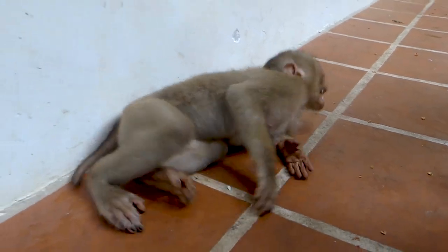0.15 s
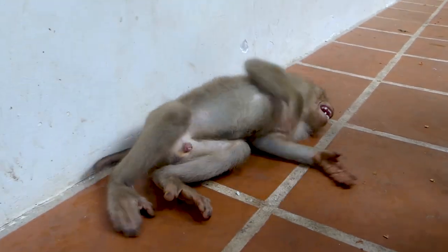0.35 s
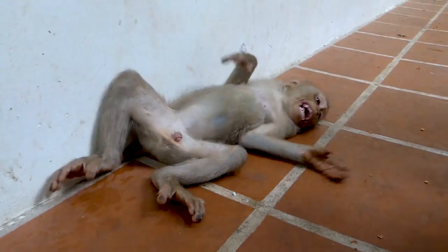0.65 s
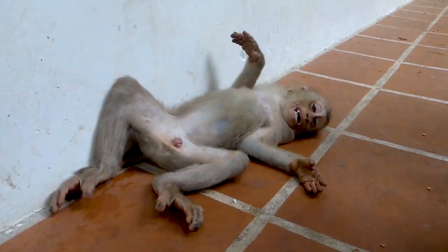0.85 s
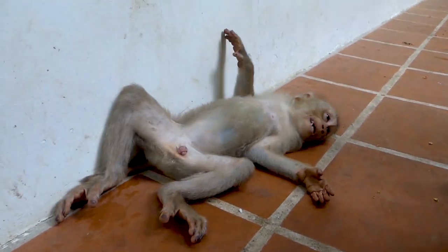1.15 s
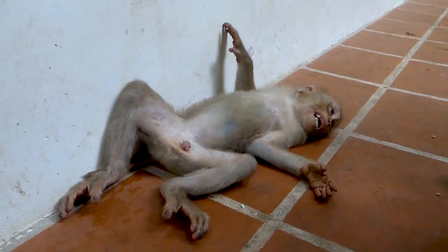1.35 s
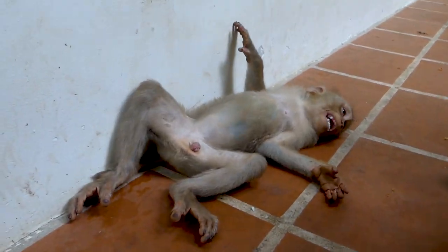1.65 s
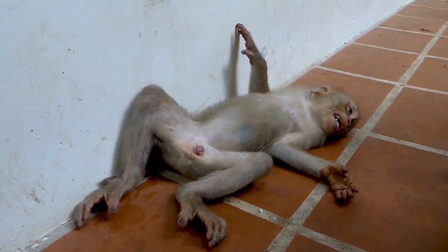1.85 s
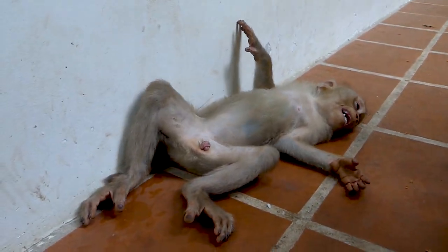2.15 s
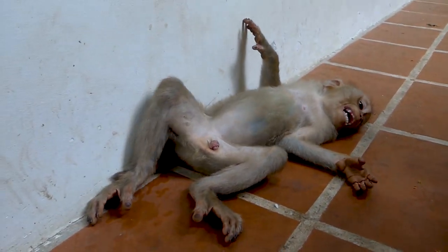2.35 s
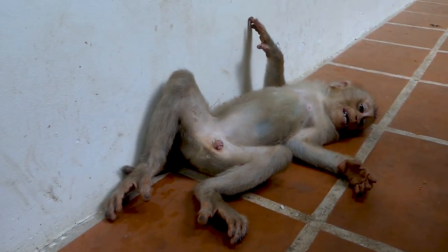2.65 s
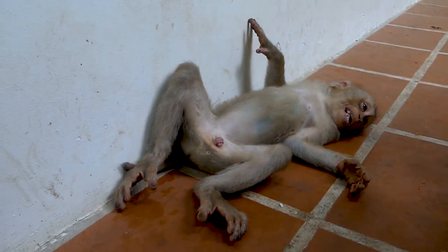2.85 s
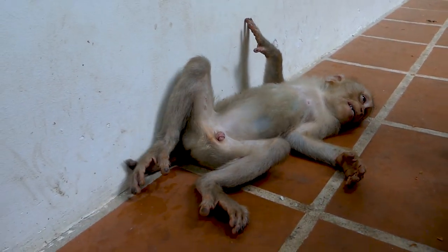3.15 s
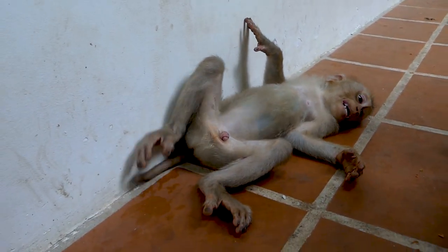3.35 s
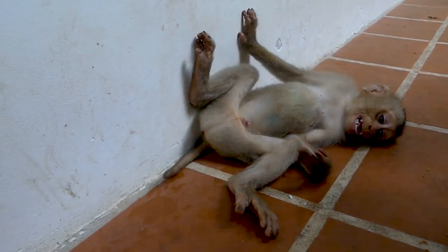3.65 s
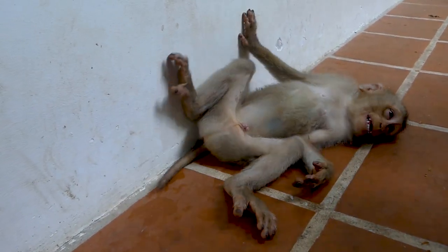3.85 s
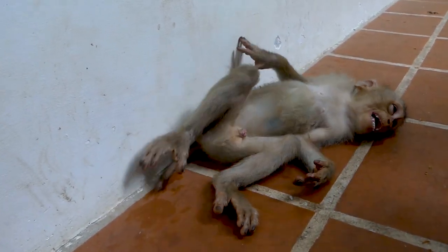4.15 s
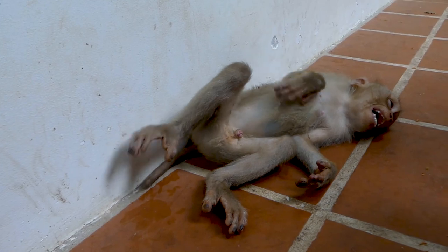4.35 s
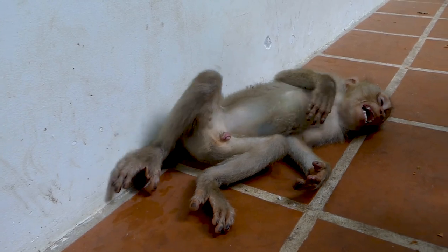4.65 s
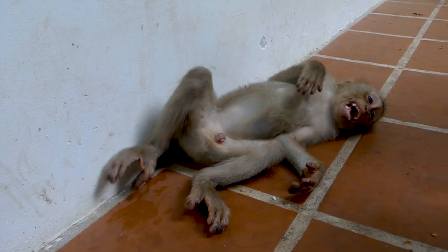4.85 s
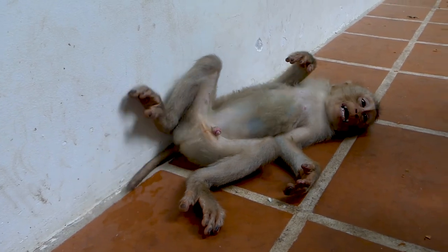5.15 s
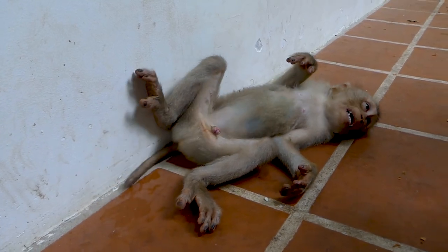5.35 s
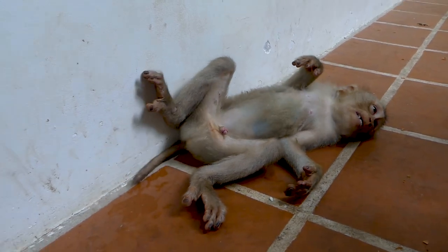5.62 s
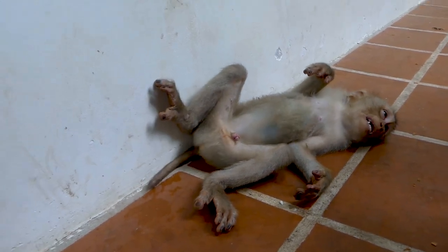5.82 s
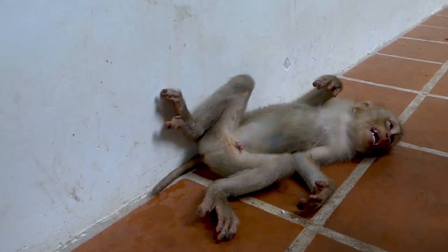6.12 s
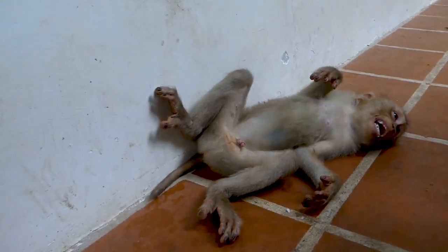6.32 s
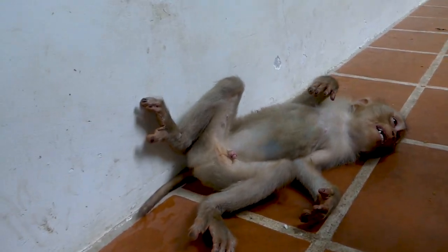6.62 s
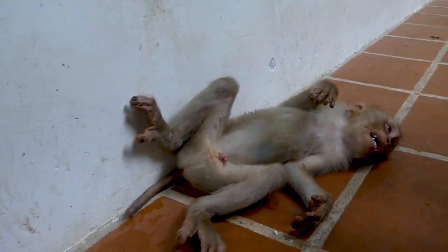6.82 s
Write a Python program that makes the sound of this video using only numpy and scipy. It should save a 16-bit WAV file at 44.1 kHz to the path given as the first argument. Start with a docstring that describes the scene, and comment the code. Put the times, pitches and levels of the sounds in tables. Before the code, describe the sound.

Twenty brief, shrill, torn monkey squeals, many starting with a click and falling squeak, ring off hard floor and wall above faint hiss.

```python
"""A low rumble with thin hiss runs throughout; a baby monkey on a tiled floor by a wall screams twenty times.
Most screams catch with a click (decaying noise) and start as a thin falling squeak (gliding harmonics).
They break into a harsh rasp (jittered folds, a stray fold, air noise) that swells, sags and runs out of air.
Some clear again into a whistle; low moans and grunts lie under the rasp, and fur brushes the tiles now and then.
Floor and wall answer each sound with quick random echoes, then the room rings on."""
import sys
import numpy as np
from scipy import signal
from scipy.fft import rfft, irfft, next_fast_len
from scipy.io import wavfile

SR = 44100
rng = np.random.default_rng(int(sys.argv[2]) if len(sys.argv) > 2 else 0)


def materialize(psi):
    """Save the field psi as 16-bit PCM at rate SR to the path in sys.argv[1].

    A 1-D psi becomes a single channel; in a 2-D psi each row is a channel.
    """
    bounded = np.clip(np.atleast_2d(psi).T, -1, 1)
    quanta = np.round(bounded * 32767).astype(np.int16)
    wavfile.write(sys.argv[1], SR, quanta)


N = 307729
CUTOFF_HZ = 15900


def from_db(db):
    """Decibels to gain."""
    return 10 ** (np.asarray(db) / 20)


def rms_one(x):
    """Scale to unit rms."""
    return x / np.sqrt(np.mean(x ** 2) + 1e-20)


def seconds(length_s):
    """Time axis in seconds."""
    return np.arange(int(length_s * SR)) / SR


def at_hz(points, hz):
    """Read a spectrum on a log-frequency axis."""
    points = np.array(points)
    return np.interp(np.log(hz + 1), np.log(points[:, 0]), points[:, 1])


def colour(x, gain_at):
    """Filter by a gain that is a function of frequency."""
    size = next_fast_len(x.shape[-1])
    gain = gain_at(np.fft.rfftfreq(size, 1 / SR))
    return irfft(rfft(x, size) * gain, size)[..., :x.shape[-1]]


def noise(spectrum, shape):
    """Coloured noise of unit rms."""
    return rms_one(colour(rng.standard_normal(shape), lambda hz: from_db(at_hz(spectrum, hz))))


def lean(x, balance):
    """Tip each frequency to the left or right."""
    return colour(x, lambda hz: from_db(at_hz(balance, hz) * np.array([[.5], [-.5]])))


def wander(rate_hz, size):
    """Random motion of spread 1, mostly slower than rate_hz."""
    return rms_one(colour(rng.standard_normal(size), lambda hz: 1 / (1 + (hz / rate_hz) ** 2)))


def gate(t, rise_s, fall_s):
    """Opens at the start of t and closes at its end."""
    return np.clip(t / rise_s, 0, 1) * np.clip((t[-1] - t) / fall_s, 0, 1)


def add(out, start_s, x):
    """Mix x in at start_s."""
    at = max(0, int(start_s * SR))
    out[..., at:at + x.shape[-1]] += x[..., :N - at]


def band(x, low_hz, high_hz):
    """A band with softly sloping edges."""
    return colour(x, lambda hz: ((1 + (low_hz / (hz + 1)) ** 20) * (1 + (hz / high_hz) ** 20)) ** -.5)


# background spectrum: freq_hz, relative_db (per Hz)
AMBIENCE_SPECTRUM = [(15, -52), (25, -31), (48, -20), (153, 0.5), (242, -11.5), (489, -7), (796, -13.5),
                     (911, -14), (1740, -19), (3340, -21.5), (3920, -19.5), (4740, -21.5), (10400, -29),
                     (11900, -27), (16000, -33.5)]
# background level: time_s, level_db
AMBIENCE_LEVEL = [(0, -51), (1.2, -53), (1.8, -51), (4.06, -50.5), (4.5, -54.5), (5.15, -55), (5.85, -51),
                  (6.98, -52.5)]
# background stereo balance: freq_hz, left_minus_right_db
AMBIENCE_BALANCE = [(60, 15), (150, 8.5), (380, 5), (950, -1), (2380, -1), (5980, 1.5), (15000, -0.5)]


def ambience(shared=0.21):
    """Distant rumble and thin hiss: coloured noise, partly alike at both ears."""
    bed = rms_one(noise(AMBIENCE_SPECTRUM, (2, N)) + shared * noise(AMBIENCE_SPECTRUM, N))
    level_db = np.interp(np.arange(N) / SR, *np.transpose(AMBIENCE_LEVEL))
    return rms_one(lean(bed, AMBIENCE_BALANCE)) * from_db(level_db)


# fur sliding on tile and wall: start_s, length_s, level_db (before the hump-shaped fade)
FUR_SLIDES = [(0.207, 0.41, -47.5), (3.422, 0.25, -43.5), (4.599, 0.22, -52)]
# fur friction spectrum: freq_hz, relative_db (per Hz)
FUR_SPECTRUM = [(290, -54), (500, -13), (960, -27), (1300, -7), (2260, -14.5), (4530, 0), (5390, -8.5),
                (16000, -12)]


def fur():
    """Soft swishes as the body shifts: noise that swells and fades."""
    out = np.zeros((2, N))
    for start_s, length_s, level_db in FUR_SLIDES:
        size = int(length_s * SR)
        add(out, start_s, noise(FUR_SPECTRUM, (2, size)) * np.hanning(size) * from_db(level_db))
    return out


def tail(spectrum, t60_s, level_db):
    """Diffuse echoes, different at each ear, dying away; level_db sets their total energy."""
    t = np.arange(SR) / SR
    echoes = noise(spectrum, (2, SR)) * from_db(-60 * t / t60_s) * np.clip(t / .006, 0, 1)
    return from_db(level_db) * rms_one(echoes) / np.sqrt(SR)


# echo spectrum of the short ring: freq_hz, relative_db
SHORT_RING_SPECTRUM = [(300, 3), (2000, -11.5), (4000, 3), (9000, 0), (16000, -3)]
# echo spectrum of the long ring: freq_hz, relative_db
LONG_RING_SPECTRUM = [(300, 0), (2600, -17.5), (3900, 0), (5500, -7.5), (7700, -8.5), (16000, -21)]


def room(x):
    """A short bright ring and a faint long one."""
    short = tail(SHORT_RING_SPECTRUM, t60_s=0.23, level_db=-14.5)
    long = tail(LONG_RING_SPECTRUM, t60_s=0.85, level_db=-28.5)
    return x + signal.fftconvolve(x, short + long, axes=1)[:, :N]


def corner(x, scatter_db, decay_s=0.0037, evenness=0.15):
    """Floor and wall add a cluster of quick echoes, new for each sound and different at each ear."""
    t = np.arange(768) / SR
    scatter = rms_one(rng.standard_normal((2, len(t))) * np.exp(-t / decay_s))
    paths = from_db(scatter_db) * scatter / np.sqrt(len(t))
    paths[:, 0] += 1   # direct sound
    response = rfft(paths, 2 * len(t))
    # rough surfaces fill the deepest notches
    paths = irfft(response / np.abs(response) ** evenness)[:, :len(t)]
    return signal.fftconvolve(x[None], rms_one(paths) / np.sqrt(len(t)), axes=1)


def folds(pitch_hz, overtone_db):
    """Harmonics of the vocal folds along a pitch track, overtone_db per overtone, at unit rms."""
    k = np.arange(1, max(2, int(CUTOFF_HZ / pitch_hz.mean()) + 1))[:, None]
    phase = 2 * np.pi * k * np.cumsum(pitch_hz) / SR
    return rms_one((from_db(overtone_db * (k - 1)) * np.sin(phase)).sum(axis=0))


def grunt(length_s, level_db, sag_db, first_hz=430, last_hz=280, below_db=-16, jitter=0.1624):
    """A faint hoarse undertone: unsteady low folds that sink while the rasp is pushed out."""
    t = seconds(length_s)
    pitch_hz = np.geomspace(first_hz, last_hz, len(t)) * (1 + jitter * wander(166, len(t)))
    push = from_db(level_db + below_db - sag_db * t / length_s)
    return folds(pitch_hz, overtone_db=-2) * push * gate(t, rise_s=0.022, fall_s=0.13)


def glide(length_s, first_hz, last_hz, level_db, overtone_db, jitter=0.017, slack_hz=3300):
    """The folds lock into one gliding note; low notes are slack and waver more."""
    t = seconds(length_s)
    waver = jitter * np.sqrt(slack_hz / first_hz) * wander(520, len(t))
    pitch_hz = np.geomspace(first_hz, last_hz, len(t)) * (1 + waver)
    # 2.5 dB lift up to 10.5 kHz, then a fall
    note = colour(folds(pitch_hz, overtone_db), lambda hz: from_db(at_hz([(10500, 2.5), (13000, -15)], hz)))
    return from_db(level_db + wander(240, len(t))) * note * gate(t, rise_s=0.004, fall_s=0.0078)


def add_note(out, start_s, note):
    """Place a clear note among its quick echoes."""
    add(out, start_s, corner(note, scatter_db=8, decay_s=0.0024, evenness=0.72))


# low voiced glides: start_s, length_s, first_pitch_hz, last_pitch_hz, level_db (before glide and throat filters)
MOAN_GLIDES = [ (.39, 0.073, 1546, 1705, -43.5), (1.441, 0.04, 1288, 1380, -38),
               (2.932, 0.0465, 1104, 971, -34.5), (3.321, 0.033, 1046, 920, -35),
               (3.626, .045, 1725, 2180, -46.5), (4.332, 0.031, 1770, 1580, -42.5),
               (5.297, .052, 1410, 1147, -41), (5.786, 0.035, 1144, 725, -33),
               (5.82, 0.027, 942, 876, -32.5), (6.088, 0.043, 1207, 1113, -40.5),
               (6.786, .04, 962, 904, -34.5)]
# throat colour of the moans: freq_hz, gain_db
MOAN_THROAT = [(800, 0), (1300, -1), (2000, 1), (3000, -2), (4500, -20), (12000, 26)]


def moans():
    """Low glides under the rasp, dipped near 4.5 kHz and lifted towards 12 kHz by the throat."""
    out = np.zeros((2, N))
    for start_s, *track in MOAN_GLIDES:
        note = glide(*track, overtone_db=-6)
        add_note(out, start_s, colour(note, lambda hz: from_db(at_hz(MOAN_THROAT, hz))))
    return out


# throat openings: start_s, level_db (noise rms before gate and decay)
THROAT_CATCHES = [(0.6464, -21.5), (.9834, -25), (1.3808, -24), (1.6829, -18.5), (1.9989, -20.5),
                  (2.362, -20), (3.304, -16.5), (3.5696, -18), (3.955, -18), (4.2372, -12.5),
                  (5.2656, -20.5), (6.054, -14.5), (6.3522, -18), (6.758, -19.5)]


def catches(decay_s=0.0027):
    """A sharp spit of air as the throat opens: bright noise dying in milliseconds."""
    out = np.zeros((2, N))
    t = seconds(0.032)
    shape = np.exp(-t / decay_s) * gate(t, rise_s=0.0012, fall_s=.005)
    for start_s, level_db in THROAT_CATCHES:
        air = noise([(300, -24), (1000, -10.0), (4000, -7.5), (6000, 1), (15000, 1)], len(t))
        add(out, start_s, corner(from_db(level_db) * air * shape, scatter_db=14))
    return out


# thin squeaks that open a scream: start_s, length_s, first_pitch_hz, level_db (before glide filter),
# db_per_overtone
OPENING_SQUEAKS = [ (0.979, 0.0083, 7670, -28, -15), (.991, 0.014, 3610, -31, -17),
                   (1.385, 0.028, 3270, -22.5, -8.5), (2.363, 0.0066, 6300, -20, 3),
                   (2.376, 0.0068, 3960, -13.5, -5), (2.902, 0.0086, 3310, -14, 0),
                   (3.303, 0.015, 3120, -19.5, -8), (3.571, 0.014, 3600, -25.5, -25),
                   (3.955, 0.019, 3500, -19.5, -54), (4.831, .019, 10500, -28.5, -28),
                   (5.275, 0.02, 3560, -24, -7), (6.054, 0.0263, 3420, -22.5, -21),
                   (6.36, 0.027, 3460, -29.5, -6.5), (6.759, 0.02, 3530, -28.5, -18)]
SQUEAK_FALL = 0.1016   # share of pitch lost


def squeaks():
    """Thin notes of the locked folds, each falling in pitch."""
    out = np.zeros((2, N))
    for start_s, length_s, first_hz, level_db, overtone_db in OPENING_SQUEAKS:
        note = glide(length_s, first_hz, first_hz * (1 - SQUEAK_FALL), level_db, overtone_db)
        add_note(out, start_s, note)
    return out


# clear notes inside a scream: start_s, length_s, rasp_change_db, first_pitch_hz, last_pitch_hz,
# level_db (before glide filter), db_per_overtone
LOCKED_WHISTLES = [ (0.189, 0.013, 6.5, 5110, 5400, -26, -39), (0.372, 0.038, 0.5, 4040, 3900, -34, -20),
                   (0.728, 0.029, -3, 3480, 3200, -37, -20),
                   (1.726, 0.0333, -15.5, 3900, 3620, -25.5, -1.5),
                   (2.05, 0.027, -12.5, 3910, 3790, -22, 1), (2.41, .04, -15.5, 3956, 3640, -24.5, 0),
                   (3.32, 0.014, -18, 2600, 2480, -25, -50), (3.328, 0.019, 0.5, 2046, 1900, -25.5, -20),
                   (3.348, 0.019, -3, 4940, 4740, -31, -36), (3.591, 0.0307, 0, 2976, 3157, -25.5, -24),
                   (3.618, 0.03, -13, 3670, 3710, -33, -1.5), (3.969, 0.021, 2, 2384, 1916, -23.5, -23),
                   (4.876, 0.0447, -2.5, 4200, 4056, -28, -17), (6.075, 0.014, 1.5, 2400, 2090, -21.5, -26)]


def whistles():
    """The folds lock into a clear note; also returns the change of the rasp meanwhile, in dB."""
    out, rasp_change = np.zeros((2, N)), np.zeros(N)
    for start_s, length_s, change_db, *note in LOCKED_WHISTLES:
        add_note(out, start_s, glide(length_s, *note))
        add(rasp_change, start_s, change_db * gate(seconds(length_s), rise_s=0.0087, fall_s=0.0023))
    return out, rasp_change


# glide of the out-of-step second fold: first_hz, last_hz
STRAY_FOLD_HZ = (2059, 1453)


def torn_voice(t, first_hz, last_hz, rough, jitter=0.0608, jitter_hz=450, air=2.45, sag=.05):
    """Overdriven folds vibrate chaotically, slip out of step with each other and chop the air stream."""
    # dips in the middle of the scream, then climbs back, on top of a steady fall
    pitch_hz = np.geomspace(first_hz, last_hz, len(t)) * (1 - sag * np.sin(np.pi * t / t[-1]))
    leading = folds(pitch_hz * (1 + jitter * rough * wander(jitter_hz, len(t))), overtone_db=0.0)
    stray_drift = .11 * wander(44.94, len(t)) + 0.0171 * wander(735, len(t))
    stray = folds(np.geomspace(*STRAY_FOLD_HZ, len(t)) * np.exp(stray_drift), overtone_db=-0.16)
    source = leading + rough ** 2 * (1.57 * stray + air * rng.standard_normal(len(t)))
    return source * from_db(3.44 * wander(540, len(t)))   # the folds slap in uneven bursts


# throat colour of the rasp: freq_hz, gain_db
RASP_THROAT = [(150, -23.5), (380, -14), (650, -11), (950, -11), (1500, -5.5), (2000, 0.5), (2900, -4.5),
               (4800, -3), (5500, -2.5), (6400, 1), (8000, 6), (9100, 0), (10800, 2.5), (15500, -6.5)]
MOUTH_WIDTH = 0.2   # half width of the resonance / its frequency
MOUTH_FALL, MOUTH_BLUR = 0.033, 0.75   # frequency and height lost over a scream, as shares of mid-scream values
CLUMP_DB, CLUMP_SPACING_HZ, CLUMP_FALL = 1.9, 168, 0.13   # streak spread, spacing at the start, share slid down


def mouth(x, mid_hz, mid_height_db, count=9):
    """A closing mouth: a resonance sinks and flattens, with sliding random streaks, over a few positions."""
    u, out = np.linspace(0, 1, len(x)), 0
    clumps_db = CLUMP_DB * rng.standard_normal(size=256)
    for place in np.linspace(0, 1, count):
        centre_hz = mid_hz * (1 + MOUTH_FALL * (.5 - place))
        height_db = mid_height_db * (1 + MOUTH_BLUR * (.5 - place))
        clumps_hz = np.arange(len(clumps_db)) * CLUMP_SPACING_HZ * (1 - CLUMP_FALL * place)

        def gain_at(hz):
            """Throat, resonance and streaks."""
            peak_db = height_db / (1 + ((hz / centre_hz - 1) / MOUTH_WIDTH) ** 2)
            return from_db(at_hz(RASP_THROAT, hz) + peak_db + np.interp(hz, clumps_hz, clumps_db))

        crossfade = np.maximum(1 - np.abs(u - place) * (count - 1), 0)
        out = out + colour(x, gain_at) * crossfade
    return out


SWELL_DB, DEEP_SWELL_DB = 37, 42   # rise per scream length before the crest: middle, deep
SHRILL_FADE_DB = 4   # extra loss by the end
RELEASE_FROM, RELEASE_DB = 0.77, 9.5   # share of the length where the air runs out, loss by the end
TREMBLE_DB, TREMBLE_HZ = -0.05, 44.3   # unsteady push


def effort(u, crest, sag_db):
    """Breath push in dB on the deep, middle and shrill parts, as u runs 0-1; shrill is there at once."""
    early = np.maximum(crest - u, 0)
    sag = sag_db * np.maximum(u - crest, 0) / (1 - crest)
    release = RELEASE_DB * np.maximum(u - RELEASE_FROM, 0) / (1 - RELEASE_FROM)
    push = TREMBLE_DB * wander(TREMBLE_HZ, len(u)) - (sag + release)
    return push - DEEP_SWELL_DB * early, push - SWELL_DB * early, push - SHRILL_FADE_DB * u


PITCH_FALL, CLEAR_FALL = .05, .62   # share of pitch lost; added per unit of roughness below 1


def rasp(length_s, level_db, crest, sag_db, deep_db, shrill_db, first_hz, rough,
         mouth_hz, mouth_db, top_db, top_fade_db=6):
    """The torn voice coloured by throat and mouth; its top octave fades as the push slackens."""
    t = seconds(length_s)
    source = torn_voice(t, first_hz, first_hz * (1 - PITCH_FALL - CLEAR_FALL * (1 - rough)), rough)
    source = mouth(source, mouth_hz, mouth_db)
    top = colour(source, lambda hz: at_hz([(8000, 0), (12000, 1)], hz))
    source = source + top * (from_db(top_db + top_fade_db * (1.0 - t / length_s)) - 1)
    deep, middle, shrill = effort(t / length_s, crest, sag_db)
    registers = [(100, 2650, deep + deep_db), (2800, 5500, middle), (5500, 17000, shrill + shrill_db)]
    sound = sum(from_db(level_db + db) * rms_one(band(source, low, high)) for low, high, db in registers)
    return sound * gate(t, rise_s=0.0034, fall_s=0.0037)


# the screams: start_s, length_s, level_db (middle part before effort), crest (share of length), sag_db,
# deep_db and shrill_db (relative to the middle part), first_pitch_hz, roughness (1 = torn),
# mouth_hz and mouth_height_db (mid-scream), top_octave_db (at the end)
SCREAM_LIST = [ (0.093, 0.11, -18.5, 0.23, 6.5, -19, -6, 4055, .96, 4000, 13, -3),
               (0.334, .13, -23, 0.5, 13.5, -7, -4, 4260, .98, 4450, 5, 4),
               (.652, 0.11, -21.5, 0.22, 12, -9, -2.5, 4130, 1, 3860, 7, -2),
               (0.996, 0.11, -23, 0, 9.5, -3.5, 1.5, 3640, 1.01, 3300, 16.5, -6),
               (1.397, 0.088, -22.5, 0.04, 12, -2.5, 0, 1640, 1.04, 2750, 9, -14),
               (1.688, 0.098, -24, 0.11, 6.5, -4, 2, 3870, 1.01, 2960, 7, -7),
               (2.009, 0.11, -25.5, 0.07, 5, -4, 3.5, 2393, 1.11, 3020, 6, -4.5),
               (2.38, 0.088, -24.5, 0, 12, -1.5, 4.5, 2050, 1.14, 3330, 9.5, -10),
               (2.911, 0.086, -32, 0, 21.5, 3, 2, 1268, 0.54, 2970, 9, -6),
               (3.313, 0.063, -23.5, 0.03, 7, 0, 3, 1205, 0.58, 3700, 4, -12),
               (3.575, 0.09, -24.5, 0.01, 13, 2, 5, 1592, 1.02, 3120, 20, -0.5),
               (3.964, 0.11, -26, 0, 5, -0.5, 4.5, 2415, 1.1, 2560, 3.5, -1.5),
               (4.238, 0.12, -23.5, 0.18, 7.5, -10, 0.5, 4005, 0.96, 4080, 8.5, 1),
               (4.503, .13, -24, 0.31, 12, -8.5, 1, 2398, .97, 4900, 5, -0.5),
               (4.844, 0.11, -25.5, 0.48, 10.5, -12.5, 3.5, 4290, .94, 4380, 8, -5),
               (5.285, .072, -27, 0.18, 12, 4, 4.5, 1944, 0.77, 2040, 6, -9),
               (5.768, 0.085, -29, 0.13, 6, -2.5, -0.5, 1059, 0.76, 2020, 0.5, -8),
               (6.069, 0.094, -22.5, 0, 19.5, -7, 4.5, 1139, 0.61, 4740, -1, -11.5),
               (6.371, 0.087, -23.5, 0.02, 10, -5, 2.5, 1302, 0.82, 3270, -0.5, -7),
               (6.769, 0.087, -24, 0.18, 24.5, -3.5, 2.5, 995, 0.94, 6400, -0.5, -10.5)]
GRUNT_CLEAR_LOSS_DB = 32   # undertone lost per unit of roughness below 1


def screams():
    """Rasps of the torn voice, each with its grunt, echoed by floor and wall."""
    out = np.zeros((2, N))
    for start_s, length_s, level_db, crest, sag_db, deep_db, shrill_db, first_hz, rough, *vowel in SCREAM_LIST:
        voice = rasp(length_s, level_db, crest, sag_db, deep_db, shrill_db, first_hz, rough, *vowel)
        add(out, start_s, corner(voice, scatter_db=18.0))
        grunt_db = level_db + shrill_db - GRUNT_CLEAR_LOSS_DB * (1 - rough)
        add(out, start_s, corner(grunt(length_s, grunt_db, sag_db), scatter_db=3.5))
    return out


def monkey():
    """All sounds of one mouth; each whistle lowers or lifts the rasp while the folds are locked."""
    clear, rasp_change_db = whistles()
    return screams() * from_db(rasp_change_db) + clear + squeaks() + moans() + catches()


# stereo balance of the voice: freq_hz, left_minus_right_db
VOICE_BALANCE = [(400, 4), (1000, -3.5), (2500, -3), (4500, 0.5), (14000, 0)]


def scene():
    """The monkey in its room."""
    return ambience() + fur() + lean(room(monkey()), VOICE_BALANCE)


def record(dry):
    """The top is cut steeply."""
    return signal.sosfilt(signal.ellip(10, .2, 70, CUTOFF_HZ, fs=SR, output="sos"), dry)


dry = scene()
out = record(dry)
materialize(out)
```